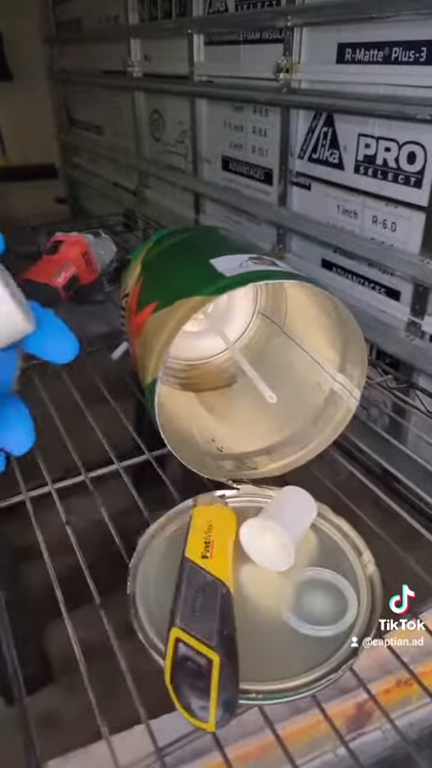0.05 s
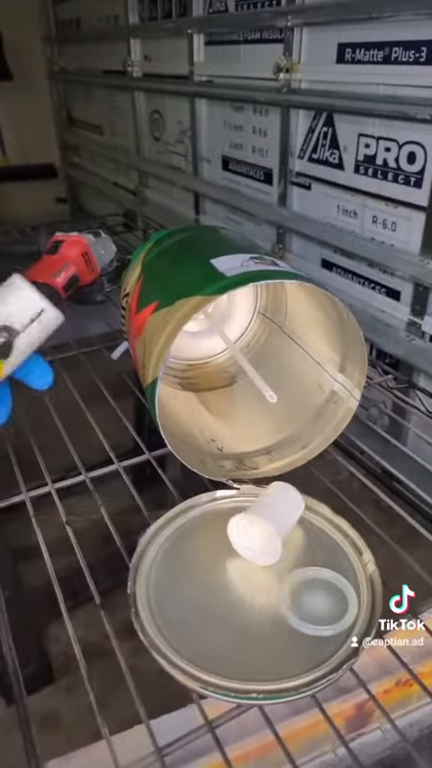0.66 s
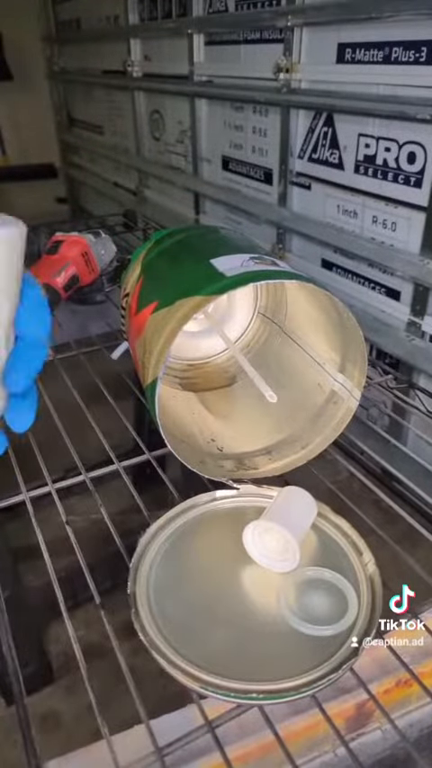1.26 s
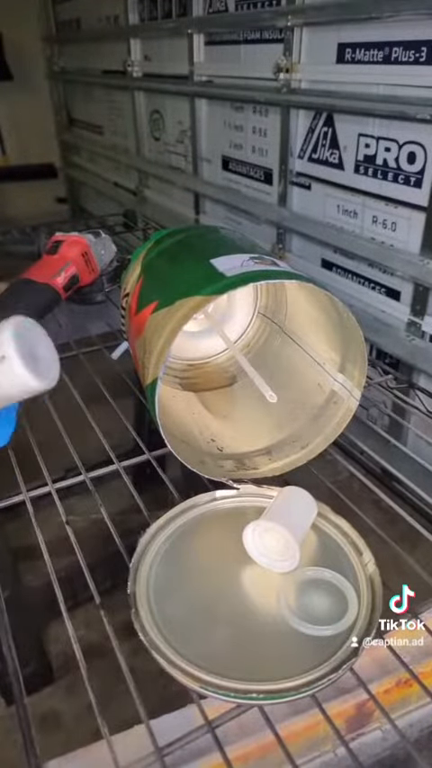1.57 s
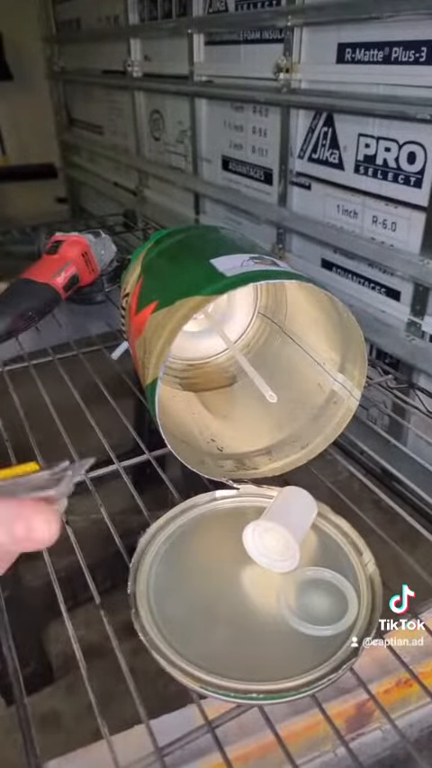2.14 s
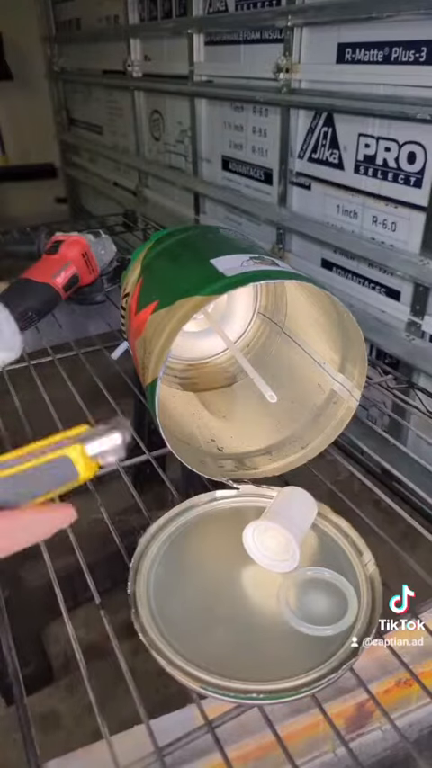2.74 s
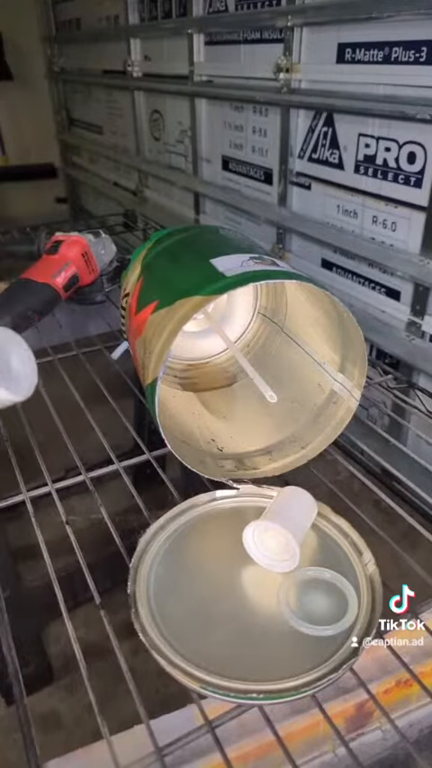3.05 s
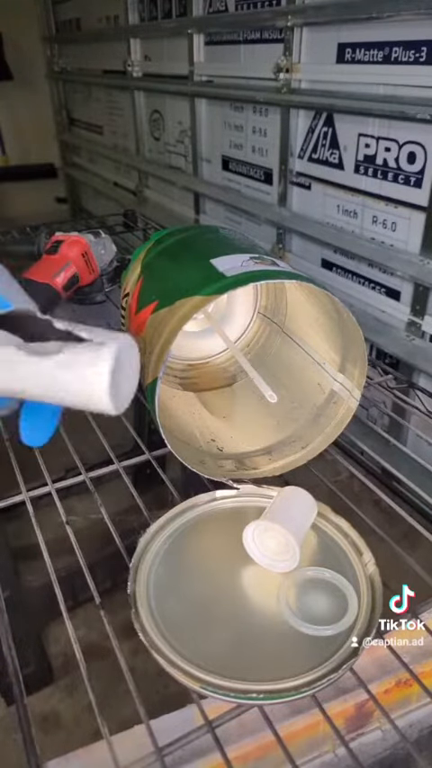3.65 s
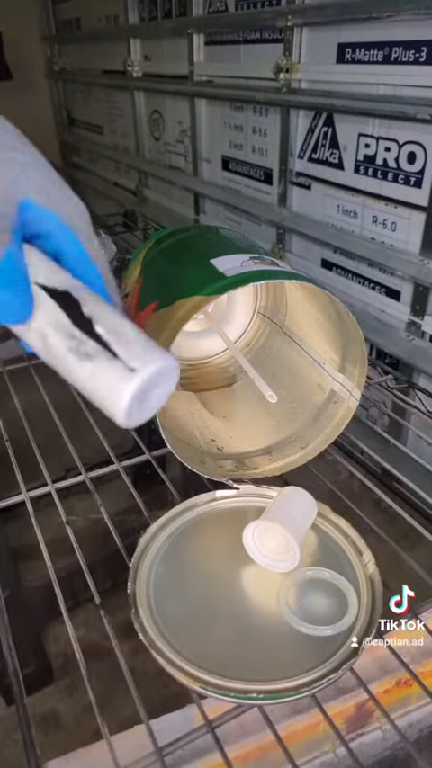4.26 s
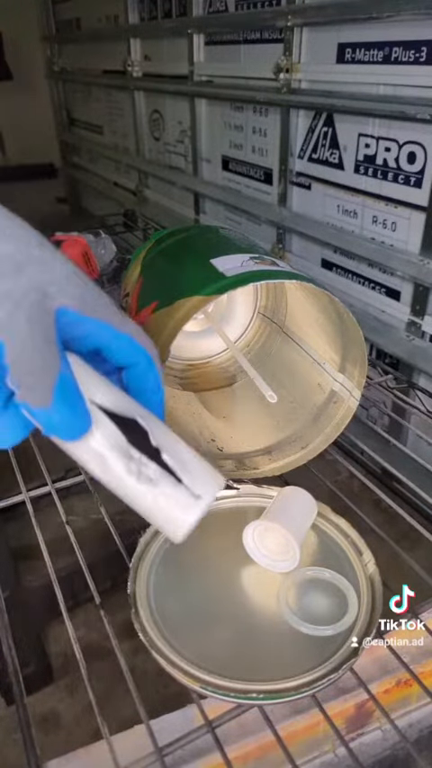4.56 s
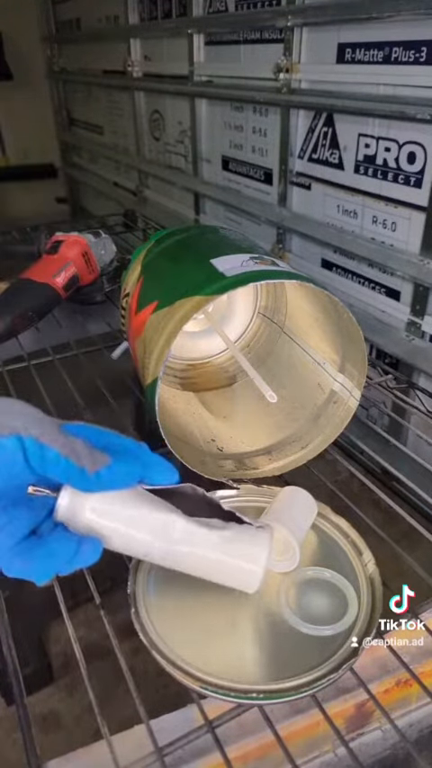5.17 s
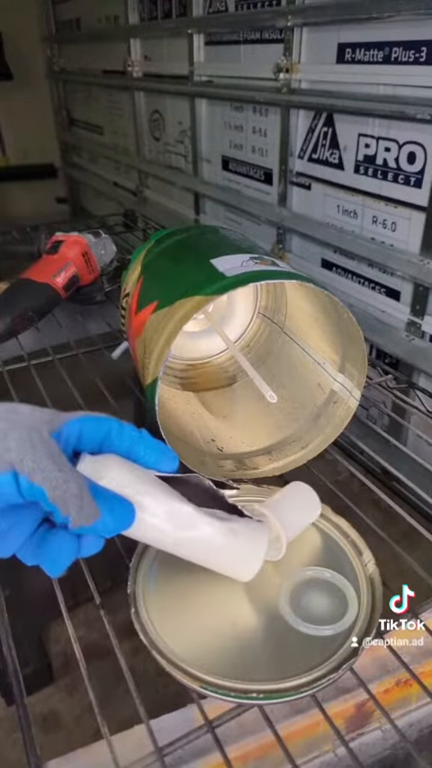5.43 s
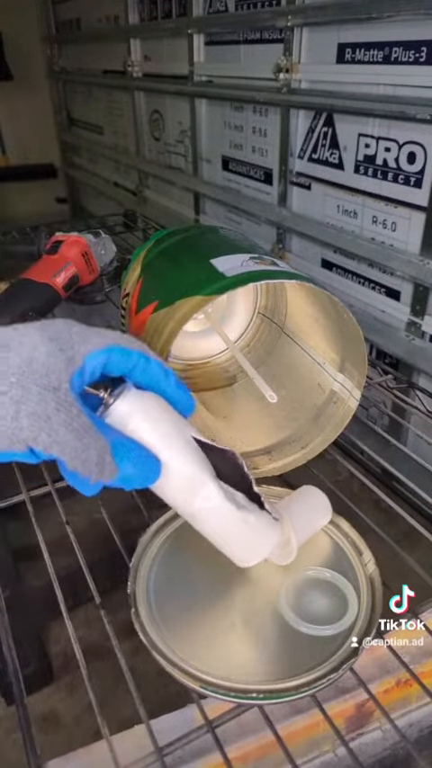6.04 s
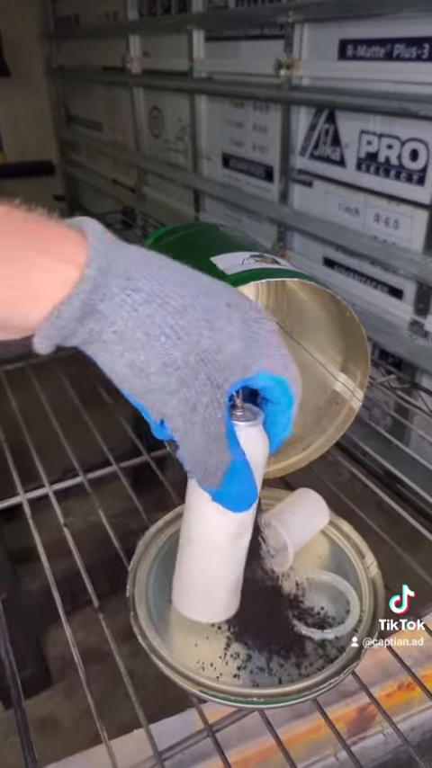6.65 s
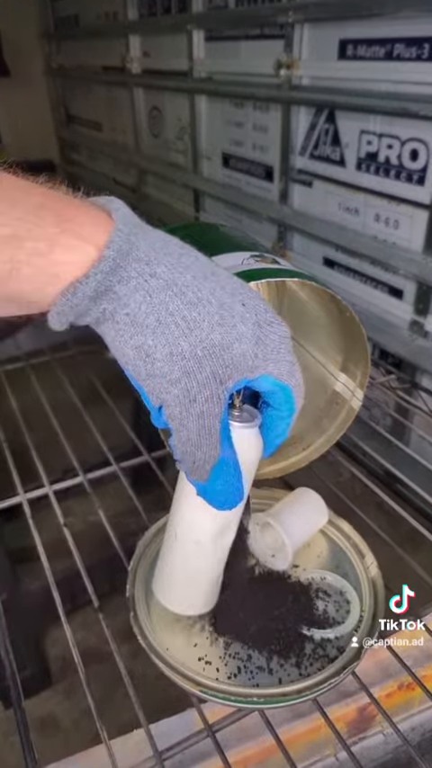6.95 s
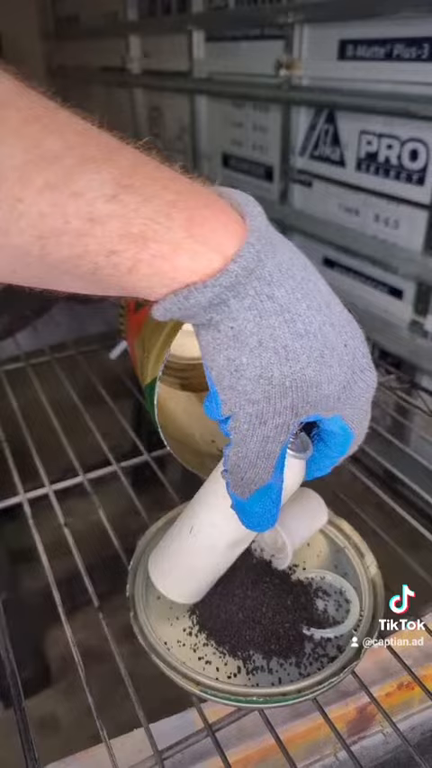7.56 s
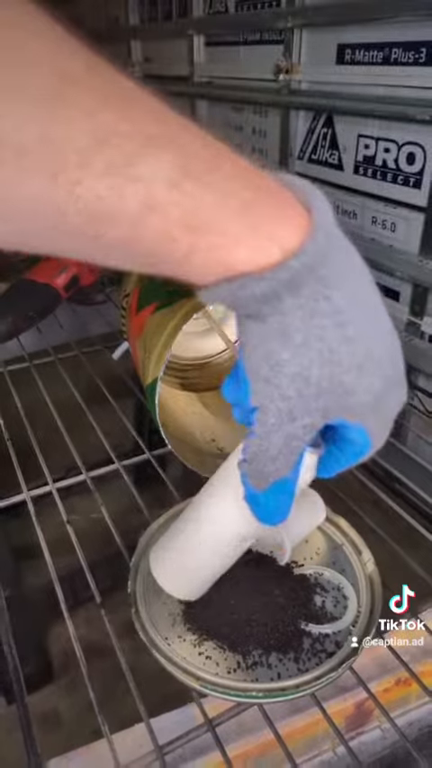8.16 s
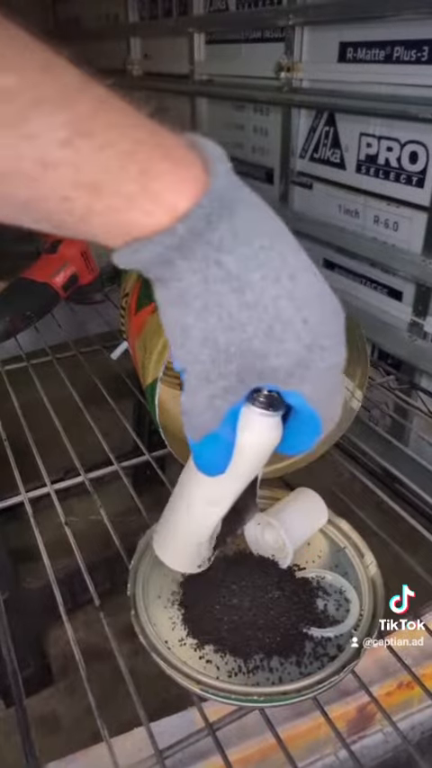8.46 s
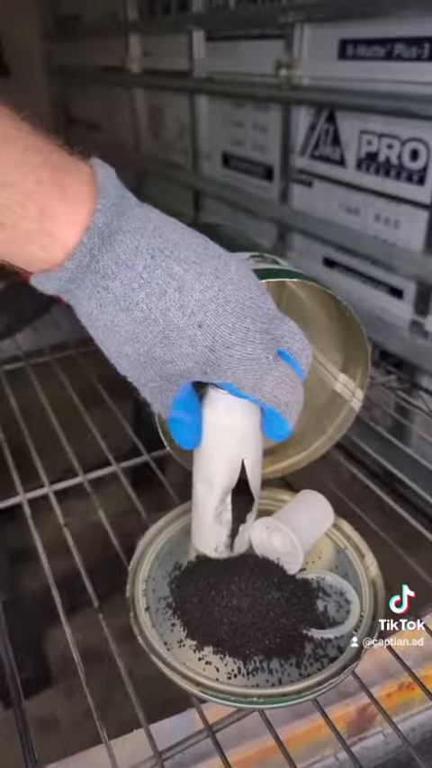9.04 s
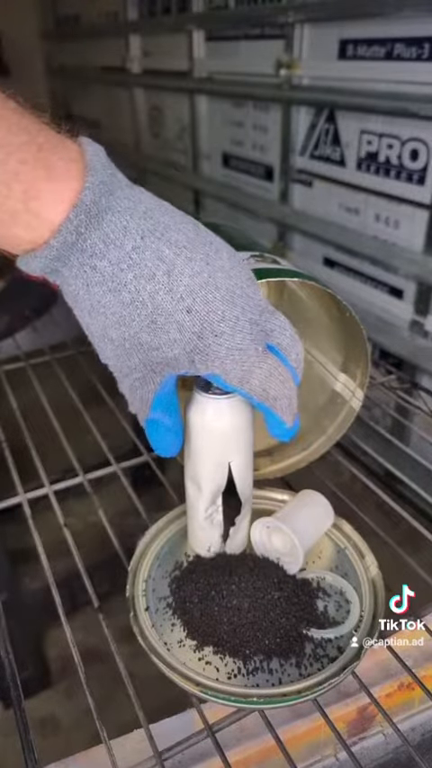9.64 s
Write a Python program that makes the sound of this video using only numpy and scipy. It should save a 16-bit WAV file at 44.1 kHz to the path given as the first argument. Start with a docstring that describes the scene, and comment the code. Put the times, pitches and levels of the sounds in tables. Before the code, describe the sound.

Close metallic clicks and scrapes, small rubber squeaks, then clanging taps on a can lid and fine powder pattering onto it.

```python
"""A knife is put down on a tin can lid that lies on a wire rack, and the metal rings on. Close by in a
small room, gloved hands pry and peel the slit shell of a thin metal cartridge: it scrapes and snaps; the
rubber rustles, squeaks and creaks. The cartridge is knocked on the lid, which clangs. Powder slides
inside in surges and spills onto the lid. Underneath: a faint hum, later a low rumble."""
import sys
import numpy as np
from scipy import signal
from scipy.fft import rfft, irfft, next_fast_len
from scipy.io import wavfile
from scipy.ndimage import uniform_filter1d

SR = 44100
rng = np.random.default_rng(int(sys.argv[2]) if len(sys.argv) > 2 else 0)


def master_out(mix):
    """Clip the mix to full scale and print it as 16-bit PCM to the path in sys.argv[1]."""
    frames = np.transpose(np.atleast_2d(mix))
    ceiling = np.clip(frames, -1, 1)
    pcm = np.round(ceiling * 32767).astype(np.int16)
    wavfile.write(sys.argv[1], SR, pcm)


N = 436590

# Modes of the lid. Each row: frequency in Hz, level in dB, t60 in seconds.
LID_MODES = [(580, -2, 0.35), (626, -4.5, 1), (712, -1, 0.8), (738, -0.5, 0.4), (999, -5.5, 0.35),
             (1166.5, -2, 0.51), (1265, -3.5, .65), (1372, -7, 0.65), (1772, -2, 0.5), (1910, -10, .7),
             (2160, -7, 0.66), (2292, -7, 0.69), (2537, -8.5, .5), (2933, -3.5, 0.63), (4270, -5, 0.7),
             (4380, -4, .75), (4870, -11, .5)]
# Band edges of a knock in Hz.
KNOCK_EDGES_HZ = [200, 900, 1600, 5000, 16000]
# Spectra of shell contact and of sliding. Each row: frequency in Hz, level in dB.
SHELL_SPECTRUM = [(80, -8), (250, -2.5), (900, -2), (2000, -2), (4000, -3), (8000, 2.5), (13000, -1.5),
                  (16000, 0.5)]
SLIDE_SPECTRUM = [(150, -28.5), (400, -10.5), (800, -10), (1200, -4), (2200, -4.5), (3600, -13.5),
                  (11000, -12), (16000, -16.5)]


def amp(db):
    """Decibels to gain."""
    return 10 ** (np.asarray(db) / 20)


def unit(x):
    """Scales to rms 1."""
    return x / np.sqrt(np.mean(x ** 2) + 1e-30)


def read(points, hz):
    """Interpolates on a log-frequency axis."""
    f, value = np.transpose(points)
    return np.interp(np.log(hz + 1), np.log(f + 1), value)


def bins(x):
    """FFT frequencies in Hz."""
    return np.fft.rfftfreq(x.shape[-1], 1 / SR)


def filtered(x, gain):
    """Applies one gain per bin."""
    return irfft(rfft(x) * gain, x.shape[-1])


def band(x, lo_hz, hi_hz):
    """Keeps one band."""
    return filtered(x, (bins(x) >= lo_hz) & (bins(x) < hi_hz))


def add(mix, start_s, sound):
    """Mixes in a stereo sound."""
    start = round(start_s * SR)
    sound = sound[:, max(-start, 0):]
    part = mix[:, max(start, 0):][:, :sound.shape[1]]
    part += sound[:, :part.shape[1]]


def wander(shape, span):
    """Random curve of rms 1, smoothed over span points."""
    return unit(uniform_filter1d(rng.standard_normal(shape), span))


def noise(size, spectrum, grain_db=0):
    """Coloured, optionally grainy noise at two microphones that agree in the bass."""
    # Each row: frequency in Hz, left-right coherence.
    coherence = [(60, 0.99), (290, 0.84), (640, 0.55), (1400, 0.12), (5000, 0)]
    white = rng.standard_normal((2, size))
    grains = np.minimum(rng.exponential(1, size // 16 + 1), 5).repeat(16)[:size]
    left, other = white * amp(grain_db * grains)
    hz = bins(left)
    same = np.clip(read(coherence, hz), 0, 1)
    right = filtered(left, same) + filtered(other, np.sqrt(1 - same ** 2))
    return unit(filtered(np.array([left, right]), amp(read(spectrum, hz))))


def decay(x, t60_table):
    """Fades each frequency at its own rate."""
    hz, t, spectra = signal.stft(x, SR, nperseg=256)
    fade = amp(-60 * t / read(t60_table, hz)[:, None])
    return signal.istft(spectra * fade, SR, nperseg=256)[1][:, :x.shape[1]]


def swell(start_s, length_s, rise_s, fade_db_per_s):
    """Scene-long envelope: rise, hold until length_s, fade."""
    t = np.arange(N) / SR - start_s
    return np.clip(t / rise_s, 0, 1) * amp(-np.clip(fade_db_per_s * (t - length_s), 0, 200))


def ripple(size, depth_db, span_bins):
    """Crowded, irregular resonances of thin metal, as a gain per bin."""
    return amp(depth_db * wander(size // 2 + 1, span_bins))


def near_lid_mode(hz, width_hz):
    """Nearness of each frequency to a lid mode, 0 to 1."""
    return np.max([1 / (1 + ((hz - f) / width_hz) ** 2) for f, _, _ in LID_MODES], axis=0)


def contact_tone(x, edges_hz, db, tilt_db_per_oct, pitch_hz, lift_db, arch_db, span):
    """Sets band peaks, averaged over span samples: harder contacts are brighter, the pitch is lifted."""
    centres_hz = np.sqrt(np.multiply(edges_hz[:-1], edges_hz[1:]))
    octaves = np.log2(centres_hz / 2000)
    target_db = db + tilt_db_per_oct * octaves - arch_db * octaves ** 2
    target_db += lift_db * np.exp(-np.log2(centres_hz / pitch_hz) ** 2)
    x = filtered(x, (1 + (212 / (bins(x) + 1)) ** 4) ** -.5)  # small thin parts radiate little bass
    for _ in range(2):
        bands = [band(x.mean(0), lo, hi) for lo, hi in zip(edges_hz, edges_hz[1:])]
        peak_db = 10 * np.log10([uniform_filter1d(b ** 2, span).max() for b in bands])
        x = filtered(x, amp(read(np.c_[centres_hz, target_db - peak_db], bins(x))))
    return x


def background(air_db=-63.5, rumble_db=-58, rumble_start_s=3.75, waver_rad=0.4):
    """Room air, a wavering hum and a low rumble that sets in partway."""
    # Each row: frequency in Hz, level in dB.
    hum_tones = [(93, -76), (120, -68.5), (133, -70), (361, -77)]
    air_spectrum = [(25, -15.5), (70, -5), (127, 2), (260, -9.5), (360, -14), (860, -23.5), (3000, -34.5),
                    (16000, -40)]
    rumble_spectrum = [(20, -18), (45, -4), (85, 2), (150, -11), (215, -11.5), (400, -32), (900, -90.5)]
    t, knots_s = np.arange(N) / SR, np.arange(0, 11, 0.125)
    hum = np.zeros(N)
    for hz, db in hum_tones:
        drift = np.interp(t, knots_s, np.cumsum(waver_rad * rng.standard_normal(len(knots_s))))
        hum += amp(db) * np.sqrt(2) * np.sin(2 * np.pi * hz * t + drift)
    air = amp(air_db) * noise(next_fast_len(N), air_spectrum)[:, :N]
    rumble = amp(rumble_db) * noise(next_fast_len(N), rumble_spectrum)[:, :N]
    return hum + air + rumble * np.clip((t - rumble_start_s) / 0.067, 0, 1)


def reflections(x, wet_db=-18):
    """Dense, short echoes from the panels around the bench."""
    tail = noise(16384, [(100, 0), (3000, 0), (16000, -6)])
    tail = decay(tail, [(200, 0.4), (1500, 0.22), (12000, 0.13)])
    tail[:, :130] = 0  # 3 ms pre-delay
    return amp(wet_db) * signal.fftconvolve(x, tail / np.linalg.norm(tail[0]), axes=1)[:, :N]


def from_left(x, lag_samples=5):
    """Sound from the left reaches the right microphone late."""
    return np.array([x[0], np.pad(x[1], (lag_samples, 0))[:N]])


def grain_stream(body, fizz, spectrum, grain_db, flutter_db, lid_db=0, catches_per_s=11, tick_s=0.00086):
    """Countless fine contacts at an uneven rate; body and fizz are the low and high envelopes."""
    grains = noise(next_fast_len(N), spectrum, grain_db)
    hz = bins(grains)
    lid_gain = amp(lid_db * near_lid_mode(hz, width_hz=23))
    grains = filtered(grains, lid_gain * ripple(grains.shape[1], depth_db=2.5, span_bins=N // 700))
    low = filtered(grains, 1 / (1 + (hz / 3500) ** 4))
    high = unit(grains - low)
    low /= band(low, 800, SR).std()
    flutter = unit(uniform_filter1d(wander(N, 900), 500))
    catches = (rng.random(N) < catches_per_s / SR) * rng.uniform(0.3, 0.95, N)  # coarse grains, burrs
    ticks = amp(3) * signal.lfilter([1], [1, -np.exp(-1 / (tick_s * SR))], catches)
    return (low[:, :N] * body + high[:, :N] * fizz) * (amp(flutter_db * flutter) + ticks)


def glove_rustle(rise_s=0.015, fade_db_per_s=308):
    """The glove rubs the shell, louder at each change of grip."""
    # Each row: start in seconds, length in seconds, level in dB.
    grips = [(.14, 0.092, -62), (.375, 0.1, -65.5), (.63, 0.053, -68.5), (1.16, 0.015, -63.5),
             (1.22, 0.012, -60), (1.44, 0.16, -68.5), (1.76, 0.22, -64.5), (2.0, 0.097, -69.5),
             (2.78, 0.045, -61.5), (2.92, 0.039, -66), (3.22, 0.17, -66), (3.48, .15, -63),
             (3.85, 0.082, -64.5)]
    handling = (0.0023, 4.4, -77.5)  # faint rustle between grips
    rubs = [amp(db) * swell(s, length_s, rise_s, fade_db_per_s) for s, length_s, db in grips + [handling]]
    rub = np.max(rubs, axis=0)
    return grain_stream(rub, rub * amp(1), SHELL_SPECTRUM, grain_db=4.2, flutter_db=4)


def glove_creaks(slips_per_s=85, slip_t60_s=0.014):
    """The glove gives way in runs of separate slips as the cartridge tilts."""
    # Each row: start in seconds, length in seconds, level in dB.
    runs = [(8.26, .026, -53), (8.714, .026, -56), (8.778, .042, -50), (8.897, .033, -55)]
    out, t = np.zeros((2, N)), np.arange(1024) / SR
    for start_s, length_s, db in runs:
        envelope = amp(db - 60 * t / slip_t60_s)
        for slip_s in np.arange(start_s, start_s + length_s, 1 / slips_per_s):
            add(out, slip_s + rng.normal(0, 0.00055), envelope * noise(len(t), SLIDE_SPECTRUM))
    return out


def glove_squeaks(gain_db=2.5, jitter=0.3, roughness=0.5, octave_db=-18):
    """Rubber sticks and slips in quick glides, unsteady in pitch and strength."""
    # Each row: start in seconds, length in seconds, relative level in dB, start and end pitch in Hz.
    glides = [(4.294, 0.051, -52, 2246, 1450), (4.35, 0.034, -52, 2133, 2140),
              (4.357, .022, -57, 1346, 800), (4.426, 0.0363, -56, 1500, 2024),
              (4.56, 0.027, -50, 1247, 2500), (4.583, .022, -50.5, 2057, 1300),
              (4.657, 0.018, -51, 1300, 2900), (4.664, .027, -48, 2820, 1314),
              (4.73, 0.028, -53, 2020, 2480), (4.766, 0.025, -51, 2674, 1880),
              (4.907, 0.027, -51, 1700, 2510)]
    out = np.zeros((2, N))
    for start_s, length_s, db, start_hz, end_hz in glides:
        size = round(length_s * SR)
        hz = np.linspace(start_hz, end_hz, size) * (1 + jitter * rng.standard_normal(size))
        phase = 2 * np.pi * np.cumsum(hz) / SR + rng.uniform(-1.3, 1, (2, 1))
        tone = np.sin(phase) + amp(octave_db) * np.sin(2 * phase)
        grip = 1 + roughness * wander(size, 40)
        add(out, start_s, amp(db) * tone * grip * signal.windows.tukey(size))
    return amp(gain_db) * out


def powder_slides(rise_s=0.058, fade_db_per_s=121):
    """Powder breaks loose inside the tipped shell, runs and comes to rest."""
    # Each row: start in seconds, length in seconds, body in dB, fizz in dB.
    surges = [(4.105, 0.21, -63.5, -54.5), (4.234, .11, -56.5, -51), (4.38, 0.055, -56.5, -47.5),
              (4.527, .08, -61, -51.5), (4.619, 0.035, -55, -47), (4.689, 0.18, -56.5, -51.5),
              (4.95, 0.82, -56.5, -64), (5.827, 0.086, -50, -53), (6.022, 0.16, -53, -59)]
    envelopes = [amp(db)[:, None] * swell(s, length_s, rise_s, fade_db_per_s)
                 for s, length_s, *db in surges]
    body, fizz = np.max(envelopes, axis=0)
    return grain_stream(body, fizz, SLIDE_SPECTRUM, grain_db=1.5, flutter_db=1.96)


def powder_spills(rise_s=0.045, heap_damping=1.07):
    """Powder patters on the lid; the growing heap muffles the tin, so body fades faster than fizz."""
    # Each row: start in seconds, length in seconds, fizz fade in dB per second, body in dB, fizz in dB.
    pours = [(6.24, 0.1, 49, -53, -44), (6.42, 0.21, 52, -50.5, -44), (6.78, 0.14, 19, -58.5, -52.5),
             (7.41, 0.32, 6, -62, -58), (8.96, 0.11, 62, -58, -59.5), (9.42, 0.1, 15, -77, -67)]
    # Each row: frequency in Hz, level in dB.
    spectrum = [(150, -11), (360, 2.5), (700, -0.5), (950, -4), (1250, 0.5), (1800, -3), (2700, 1),
                (4300, -4), (7000, 0), (16000, -2.5)]
    body, fizz = np.zeros((2, N))
    for start_s, length_s, fade, body_db, fizz_db in pours:
        body = np.maximum(body, amp(body_db) * swell(start_s, length_s, rise_s, fade * heap_damping))
        fizz = np.maximum(fizz, amp(fizz_db) * swell(start_s, length_s, rise_s, fade))
    return grain_stream(body, fizz, spectrum, grain_db=1.8, flutter_db=1, lid_db=4.5)


def rack_ring(start_s=0.0052, level_db=-48.5, beat_hz=22, neighbour_db=-3):
    """The wires under the lid ring on in a few clear tones; neighbouring wires beat."""
    # Each row: frequency in Hz, relative level in dB, t60 in seconds.
    modes = [(235, -7.5, 1.4), (630, -2, 1), (905, -1, 0.5), (1260, -5.5, 1.2), (2550, -22.5, .7)]
    out, t = np.zeros((2, N)), np.arange(SR) / SR
    for hz, db, t60_s in modes:
        for wire_hz, wire_db in (hz, db), (hz - beat_hz, db + neighbour_db):
            phase = 2 * np.pi * wire_hz * t + rng.uniform(-1.1, 1, (2, 1)) * hz / 1500
            add(out, start_s, amp(level_db + wire_db - 60 * t / t60_s) * np.sin(phase))
    return out


def shell_scrapes(relative_width=0.15):
    """Swells of tiny slips through a resonance of the metal, which radiates little below it."""
    # Each row: centre in seconds, strength in dB, tilt in dB per octave, length in seconds,
    # resonance in Hz, its height in dB.
    strokes = [(.012, -26.5, 0, 0.051, 2700, 1.5), (0.502, -61, 2, 0.047, 1420, 12),
               (.566, -49.5, -3.5, 0.024, 350, 4), (0.598, -54, -2, 0.048, 1370, 7),
               (.744, -57.5, -0.5, 0.043, 1500, 4.5), (0.815, -49.5, 3, 0.035, 5970, 16.5),
               (0.973, -44, 2, .03, 1220, 3), (1.103, -62, 3, 0.032, 1960, 2),
               (1.277, -47, -0.5, .024, 980, 1), (1.367, -59.5, 1.5, 0.03, 397, 11),
               (1.48, -61.5, 2, 0.063, 1500, 6), (1.53, -50.5, 1, 0.022, 6500, 7.5),
               (1.565, -51, 0.6, 0.038, 3000, 5), (1.635, -44, 1.5, 0.033, 4700, 12),
               (1.741, -53, 2, 0.027, 9700, 7), (1.818, -61, 2, 0.084, 1450, 8.5),
               (1.89, -52.5, 2.5, 0.011, 9600, 3.5), (1.972, -57.5, 1.5, 0.027, 2580, 0),
               (2.11, -45.5, 2.5, 0.031, 4200, 5), (2.146, -57, 7, 0.047, 10080, -0.5),
               (2.746, -46.5, 4, 0.026, 1520, 11.5), (2.898, -66, 3, 0.027, 8000, -1.5),
               (3.169, -41.5, 0, 0.02, 990, 10), (3.201, -54.5, 1, 0.065, 1400, -3),
               (3.307, -50.5, -0.5, 0.016, 1180, 9), (3.353, -56, -0.5, 0.042, 1190, -9),
               (3.46, -48, 0, 0.02, 2050, 9), (6.6, -46, -2, 0.025, 810, 11.5),
               (6.953, -47, 0, 0.014, 1820, 4), (7.78, -71.5, -1, 0.37, 415, 16),
               (9.078, -52.5, 1, 0.037, 302, 14.5)]
    edges_hz = [250, 1000, 4000, 16000]
    out, t = np.zeros((2, N)), np.arange(-6144, 6144) / SR
    for centre_s, db, tilt, length_s, hz, height_db in strokes:
        envelope = (1 + (2 * t / length_s) ** 2) ** -2 * signal.windows.hann(len(t))
        slips = noise(len(t), SHELL_SPECTRUM, grain_db=2)
        slips = envelope * filtered(slips, ripple(len(t), depth_db=2, span_bins=70))
        scrape = contact_tone(slips, edges_hz, db, tilt, hz, lift_db=2, arch_db=0.54, span=400)
        ratio = bins(t) / hz
        peak = 1 / (1 + ((ratio - 1) / relative_width) ** 2)
        low_shelf = 0.42 / (1 + (ratio / 0.56) ** 8)
        add(out, centre_s + t[0], filtered(scrape, amp(height_db * (peak - low_shelf))))
    return out


def metal_ticks(t60_cycles=15, click_t60_s=0.006):
    """Short metallic ticks: snaps of the shell and light taps on the lid. Higher ones are drier."""
    # Each row: start in seconds, peak in dB, ring frequency in Hz.
    ticks = [(.56, -40, 1300), (.8157, -12, 6000), (.8205, -24, 6000), (0.981, -24.5, 1600),
             (1.271, -34.5, 950), (1.5608, -30, 2200), (1.581, -31, 3000), (1.683, -34, 4000),
             (1.75, -29, 2500), (1.888, -27.5, 1800), (1.926, -33, 2500), (1.941, -33, 2000),
             (2.081, -38, 2500), (2.365, -40.5, 2210), (2.738, -35, 1546), (2.825, -31, 1210),
             (3.1628, -27, 950), (3.223, -35, 1000), (3.306, -28.5, 1170), (3.321, -31, 700),
             (3.4605, -21, 2073), (3.826, -44.5, 1290), (4.069, -42.5, 1690), (4.923, -42, 13500),
             (6.901, -35, 2500), (9.0185, -30.5, 1210), (9.366, -43, 1500)]
    out, t = np.zeros((2, N)), np.arange(1024) / SR
    for start_s, peak_db, hz in ticks:
        ring = np.sin(2 * np.pi * hz * t + rng.uniform(0.26, 1, (2, 1))) * amp(-60 * hz * t / t60_cycles)
        click = noise(len(t), SHELL_SPECTRUM) * amp(-60 * t / click_t60_s)
        highpass = signal.butter(2, min(hz / 2, 3000), "high", fs=SR)
        tick = signal.lfilter(*highpass, ring + click)
        add(out, start_s, amp(peak_db) * tick / abs(tick.mean(0)).max())
    return out


def lid_ring(t, spot_hz, detune=0.004, wobble=0.004, focus_db=7, settle_db=6, settle_s=0.04):
    """Lid modes, bent by the blow and the rocking cartridge; those near spot_hz are fed most."""
    hz, db, t60_s = np.transpose(LID_MODES)[:, :, None]
    hz = hz * (1 + detune * rng.standard_normal(hz.shape))
    octaves_off = np.minimum(abs(np.log2(hz / spot_hz)), 1)
    strike = amp(db - focus_db * octaves_off + rng.standard_normal(db.shape))
    rocking_s = wobble * np.cumsum(wander((len(hz), len(t)), 700), axis=1) / SR
    settling_db = settle_db * (np.exp(-t / settle_s) - 1)  # the cartridge soaks up the first swing
    rings = strike * amp(settling_db - 60 * t / t60_s) * np.exp(2j * np.pi * hz * (t + rocking_s))
    # Short waves reach the microphones out of step.
    mic_rad = rng.standard_normal((2, len(hz))) * np.clip(hz.T / 2400, 0, 3)
    return (np.exp(1j * mic_rad) @ rings).imag


def knock(t, ring_db, spot_hz, metal_gain, swing_t60_s=0.11, chatter_t60_s=0.26, crack_t60_s=0.019):
    """One blow: a crack, a clonk of the struck spot, chatter against the rack, ringing tin."""
    # Dense upper modes of lid, rack and can. Each row: frequency in Hz, level in dB.
    spectrum = [(100, -29.5), (300, -8), (550, -1), (1300, 1.5), (1700, -4), (6000, -14.5), (11000, -17.5),
                (16000, -27.5)]
    # Each row: frequency in Hz, t60 in seconds.
    clang_t60 = [(700, 0.82), (2500, 1), (6000, 0.52), (15000, 0.11)]
    swing = amp(-2.5 + min(ring_db, 0) - 60 * t / swing_t60_s)  # wide while the blow lasts
    modes = (swing + amp(-11 + 1.2 * ring_db)) * lid_ring(t, spot_hz)
    clang = amp(-18) * decay(filtered(noise(len(t), spectrum), metal_gain), clang_t60)
    bounces_db = 4 * np.tanh(wander(len(t), 300))
    chatter = filtered(noise(len(t), spectrum), metal_gain)
    chatter *= amp(-8.5 + bounces_db - 60 * t / chatter_t60_s)
    crack = amp(1.5 - 60 * t / crack_t60_s) * noise(len(t), spectrum)
    spot_t60_s = 0.066 * amp(0.67 * min(ring_db, 0))  # a pressed spot stops sooner
    mic_rad = min((spot_hz / 1400) ** 2, 0.7) * np.array([[-1], [1]])
    attack = 1 - np.exp(-t / 0.0027)
    clonk = attack * amp(6 - 60 * t / spot_t60_s) * np.sin(2 * np.pi * spot_hz * t + mic_rad)
    return (crack + clonk + modes + amp(ring_db) * (clang + chatter)) * (t > 0)


def lid_knocks(left_db=0.63, cluster_db=4.2):
    """Knife, then cartridge, strike the lid, slightly left; the clang clusters around its main modes."""
    # Each row: start in seconds, strength in dB, tilt in dB per octave, free ringing in dB,
    # pitch of the struck spot in Hz, lift of that pitch in dB.
    blows = [(.006, -32, 2, -24, 1380, 9), (.017, -39.5, -1.5, -29.5, 660, 7),
             (5.256, -47.5, -3.5, -0.5, 650, 6.5), (5.2935, -47, -3, 3, 680, 8.5),
             (5.3476, -23, 0.8, 3.5, 1204, 6), (5.392, -46, 0, -10, 1150, 12),
             (5.429, -38.5, -1.5, -1, 1195, 13.5), (5.533, -41.5, -3.5, 2, 700, 10.5),
             (5.546, -41, -2.5, 14.5, 720, 10), (5.657, -56, -3, 3, 1294, 9), (5.954, -58, -5, 11, 680, 11),
             (6.149, -34.5, -2, -1, 710, 10), (6.155, -40, -1.5, 6, 1270, 10.5),
             (6.169, -38, -2.5, 10, 715, 8), (6.178, -39.5, 0, 12.5, 2190, 8.5),
             (6.949, -51, -1.5, 4, 2760, 8), (7.092, -60.5, -1, 4, 1820, 7), (8.973, -49, -3, -10, 654, 11),
             (9.018, -53.5, 0.5, -21, 1220, 8), (9.066, -46.5, 0.5, -34, 1090, 5.5)]
    out, t = np.zeros((2, N)), np.arange(-400, 35600) / SR
    cluster = amp(cluster_db * near_lid_mode(bins(t), width_hz=20))
    metal_gain = unit(ripple(len(t), depth_db=2.5, span_bins=45) * cluster)
    for start_s, db, tilt, ring_db, spot_hz, lift_db in blows:
        blow = knock(np.maximum(t, 0), ring_db, spot_hz, metal_gain)
        blow = contact_tone(blow, KNOCK_EDGES_HZ, db, tilt, spot_hz, lift_db, arch_db=0.39, span=220)
        add(out, start_s + t[0], blow)
    return amp([[left_db], [-left_db]]) * out


def scene():
    """Lid, rack, shell, gloves and powder in the room."""
    near = lid_knocks() + rack_ring()
    near += from_left(shell_scrapes() + metal_ticks() + glove_squeaks() + glove_rustle())
    near += glove_creaks() + powder_slides() + powder_spills()
    return near + reflections(near) + background()


def record(dry):
    """Full-scale limit, then a low-pass at 16050 Hz."""
    lowpass = signal.firwin(511, 16050, window=("kaiser", 9), fs=SR)
    return signal.oaconvolve(np.clip(dry, -1, 1), lowpass[None], "same")


dry = scene()
out = record(dry)
master_out(out)
```